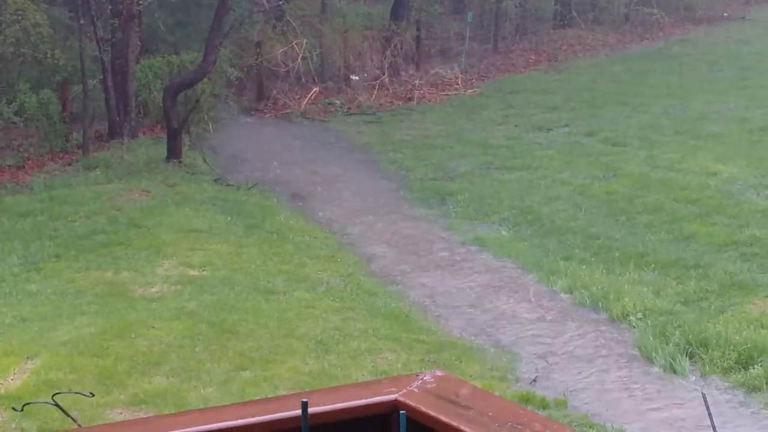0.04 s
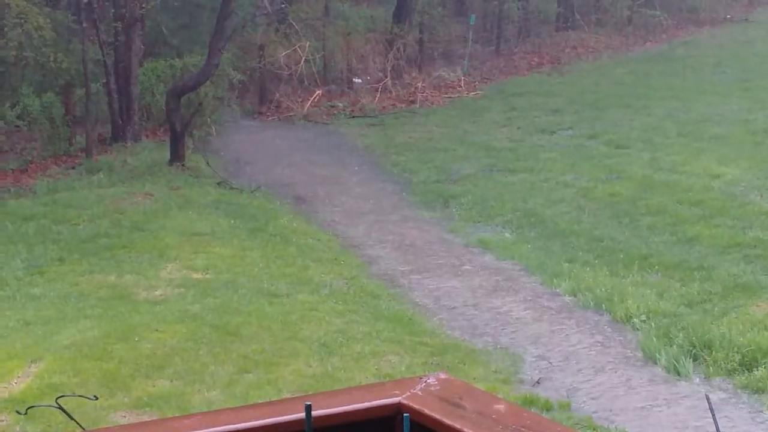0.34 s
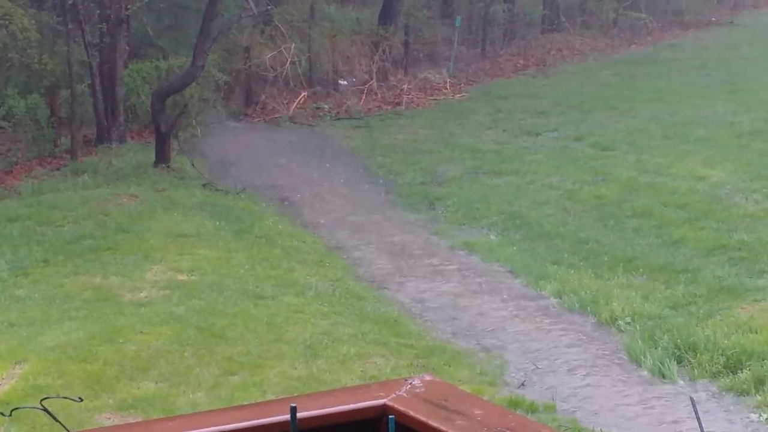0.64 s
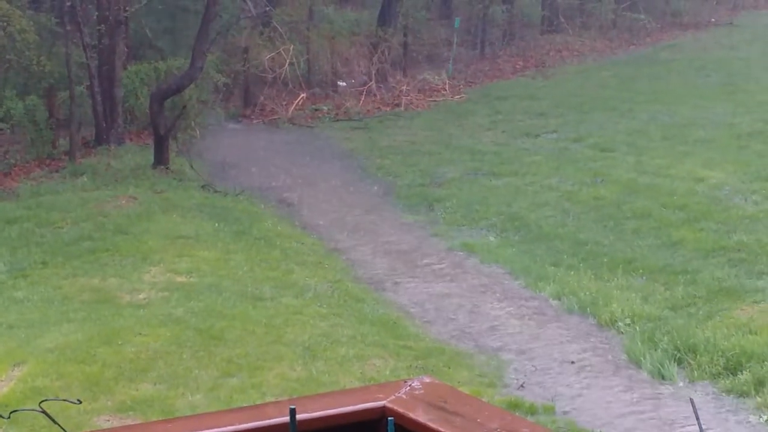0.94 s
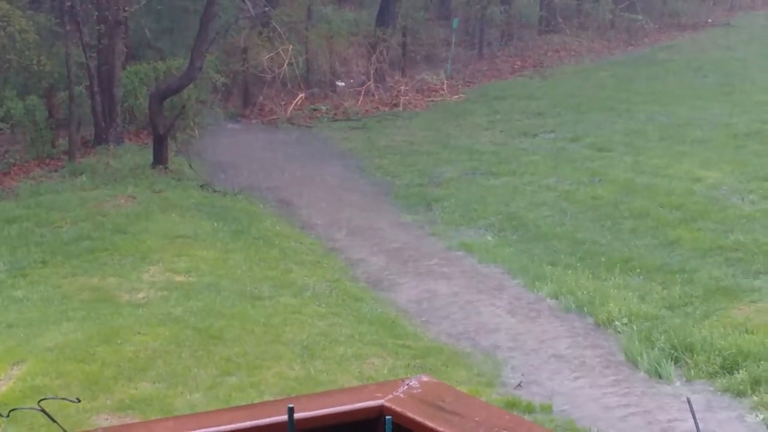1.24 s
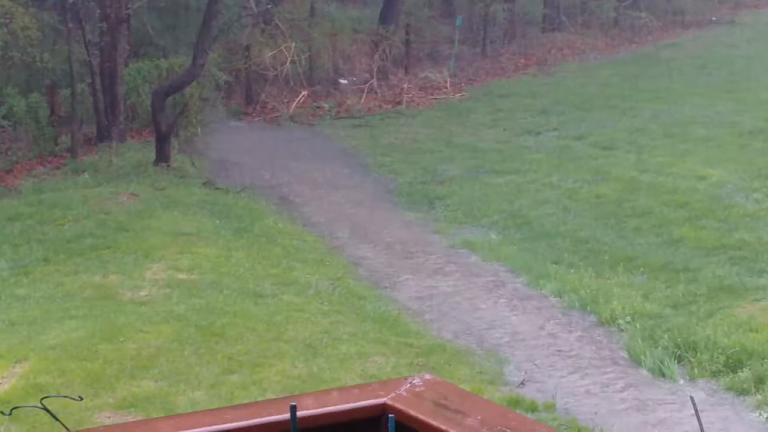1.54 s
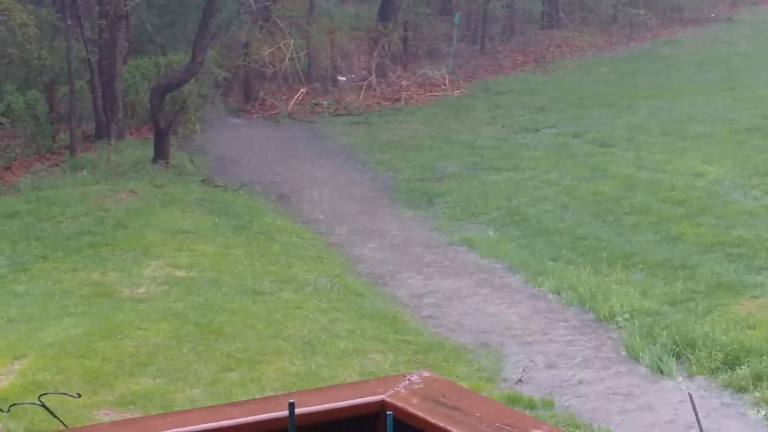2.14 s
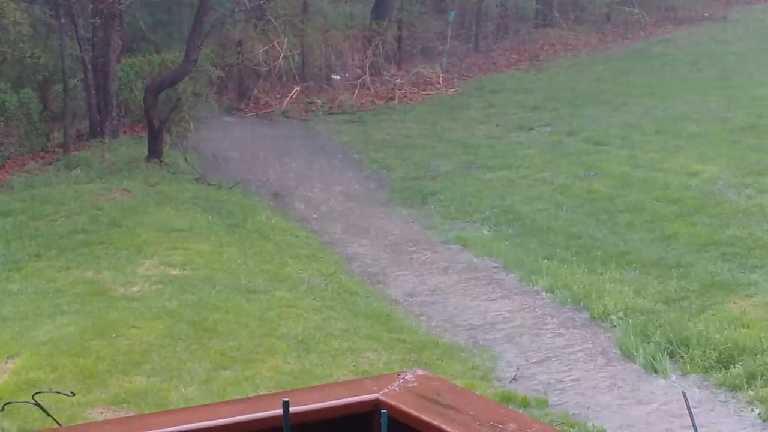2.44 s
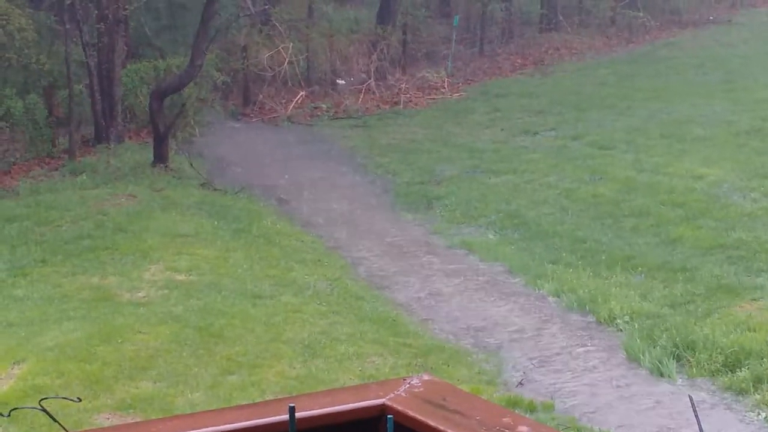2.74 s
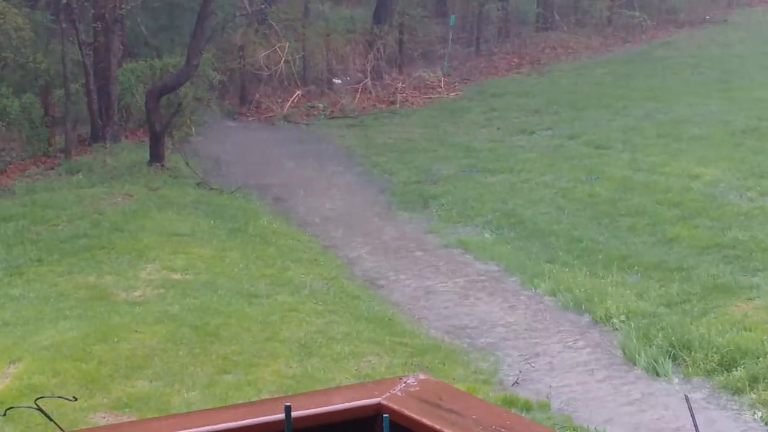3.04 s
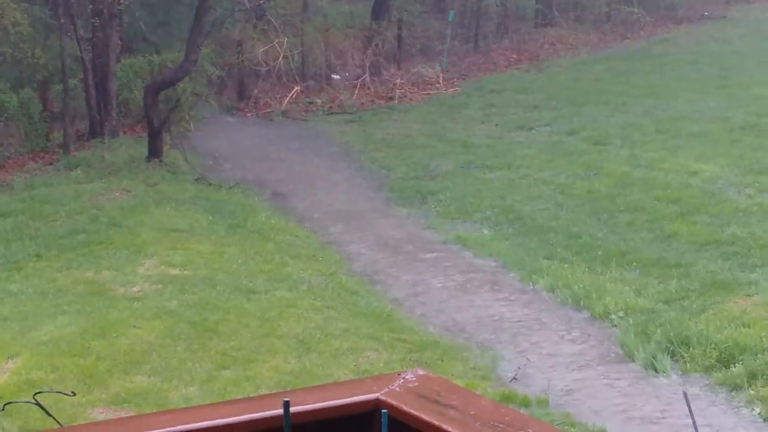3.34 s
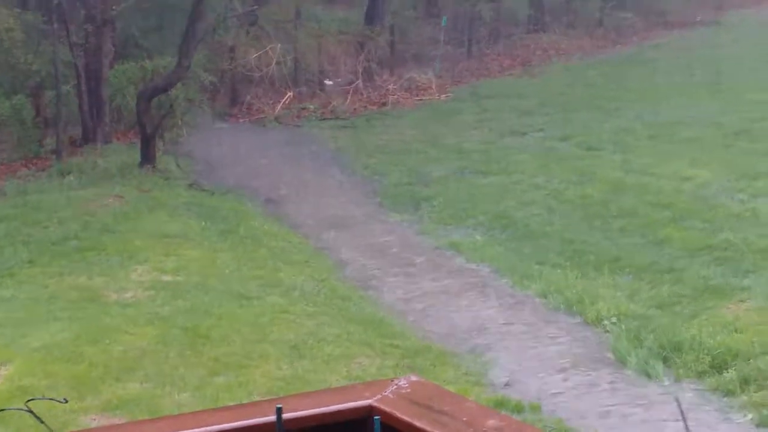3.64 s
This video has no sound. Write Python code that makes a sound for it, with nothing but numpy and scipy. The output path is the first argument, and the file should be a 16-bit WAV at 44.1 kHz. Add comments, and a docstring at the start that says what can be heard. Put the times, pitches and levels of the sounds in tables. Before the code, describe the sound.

Rain falls steadily in a backyard, heard from a wooden deck where single drops land with sharp ticks and tiny splashes, mainly on the right. Behind them are an even hiss and a low rumble like far traffic, softening near the end.

```python
"""Steady rain from a deck

Far drops on a lawn and woods merge into a hiss over a low rumble, perhaps distant traffic.
Near drops tick sharply on the deck, mostly to the right, each with a short spray; the hardest
ring briefly. A few thin, high pings sound. A limiter turns the sound down around the hardest ticks."""
import sys
import numpy as np
from scipy import signal
from scipy.fft import rfft, irfft
from scipy.io import wavfile
from scipy.ndimage import uniform_filter1d

SR = 44100
rng = np.random.default_rng(int(sys.argv[2]) if len(sys.argv) > 2 else 0)


def transcribe(signal):
    """Save signal, clipped to [-1, 1], as a 16-bit WAV file at the path in sys.argv[1]."""
    frames = np.atleast_2d(signal).T
    limited = np.clip(frames, -1, 1)
    pcm = np.round(limited * 32767).astype(np.int16)
    wavfile.write(sys.argv[1], SR, pcm)


N = 176400
TIME, HZ = np.arange(N) / SR, np.fft.rfftfreq(N, 1 / SR)

# The tone of the hiss. Each row: frequency in Hz, left and right strength in dB.
HISS_TONE = [(30, -82, -102), (197, -75.5, -71), (395, -78, -72.5), (540, -74.5, -75), (724, -73.5, -70.5),
             (830, -74.5, -73), (1250, -74, -70.5), (1660, -72.5, -69.5), (1840, -74.5, -66.5),
             (2280, -75, -68), (2670, -74.5, -66), (2880, -80.5, -68), (3290, -74, -71.5), (4280, -78, -75),
             (5000, -75, -73), (6950, -77, -76.5), (8500, -83, -69), (9600, -83.5, -75.5),
             (13400, -85, -78), (15000, -96, -84)]
# How alike the hiss is on both sides. Each row: frequency in Hz, likeness (0-1), left lead in radians.
HISS_STEREO = [(100, 1, 0.87), (400, 0.81, 0.46), (750, 0.57, 0.72), (1056, 0.3, 1.03), (1600, 0.56, 3.6),
               (1940, 0.38, 4.2), (2450, 0.6, 6.8), (2810, 0.6, 7.15), (3280, 0.55, 9.1), (4160, 0.04, 12)]
# The rain swells and eases. Each row: time in seconds, then low, middle and treble change in dB.
RAIN_LEVELS = [(0, 1.5, 0, -0.5), (.75, 0.9, 0.4, -1.8), (1.25, 2.6, 1.5, 1), (1.6, 1.6, 1.5, -0.2),
               (2.08, 2.5, 2, -0.5), (2.2, -2, -.5, -3.5), (2.6, -0.6, -0.5, -2.5), (3.12, -0.5, 0, -3),
               (3.22, -3, -2.5, -5), (3.5, -4, -5, -7), (3.7, -6.5, -7, -8), (4, -6.5, -8, -8.5)]
# The tone of the rumble. Each row: frequency in Hz, strength in dB.
RUMBLE_TONE = [(15, -88), (32, -90), (43, -64.5), (54, -80), (68, -62.5), (90, -63.5), (120, -66),
               (150, -73), (220, -68.5), (320, -78.5), (500, -88.5), (2000, -130)]
# Hums in the rumble. Each row: pitch in Hz, width in Hz.
HUMS = [(195, 35), (270, 58)]
# The low sounds over time. Each row: time in seconds, then rumble, lower hum and upper hum gain in dB.
RUMBLE_LEVELS = [(0, 0.5, -54, -68), (.75, 1, -59, -72), (.87, 0.5, -47, -57), (1.25, 2.5, -60, -56),
                 (1.7, 2, -52, -48), (2.05, 3, -45.5, -44), (2.2, 1.5, -48.5, -51), (2.66, -1.5, -47, -54),
                 (2.74, .5, -48, -41), (2.88, 0, -46, -52), (3.12, 0, -44.5, -48), (3.25, -3, -47.5, -48),
                 (3.45, -6, -44, -57), (3.6, -3.5, -54, -53), (3.85, -4, -48, -50.5), (4, -5.5, -50.5, -63)]
# Loud drops. Each row: start in seconds, then level, body, treble and left-side gain in dB,
# ringing pitch in Hz, spray gain in dB.
LOUD_DROPS = [(.0905,-4.5,-12,-19,-3.5,8750,-25), (.1055,-16,-23,-11,0,8770,-18),
              (0.1127,-10,-23,-17,-15,8400,-24), (.193,-18,-16,-11,-4,8580,-16),
              (0.2127,-10,-25,-24,-7,7900,-23), (.341,-18,-23,-14,-7,9930,-16),
              (0.3482,-12,-19,-14,-8,8580,-22), (0.381,-5,-25,-26,-7,8600,-32),
              (.4319,-17.5,-18,-14,-5,8150,-28), (0.4965,-12.5,-26,-22,-3.5,7760,-21),
              (.576,-15,-17,-16,-7,8950,-28), (0.8897,-13.5,-13,-20,-6,8610,-26),
              (0.916,-13,-16,-16,-7,7700,-22), (0.9904,-13,-22,-21,0.5,7800,-26),
              (1.0014,-17,-19,-14,-11,8390,-14.5), (1.0585,-11.5,-24,-18,-8,8970,-21),
              (1.0872,-19,-18,-17,-5,8800,-24), (1.2588,-16.5,-18,-20,-7.5,11500,-26),
              (1.286,-21,-21,-13,-6.5,8110,-28), (1.2995,-11,-23,-17,-9,8850,-19),
              (1.3085,-14,-18,-24,-3,6030,-19), (1.5153,-14,-25,-13,-9,9150,-30),
              (1.5378,-11,-25,-25,-12,8900,-30), (1.5738,-14,-18,-17,-9,9200,-26),
              (1.67,-2.5,-10,-13,-9,8700,-25), (1.7268,-12.5,-24,-23,-10,9300,-33),
              (1.902,-10.5,-28,-18,-8,9000,-21), (2.0239,-17.5,-12,-14,-5,8420,-18),
              (2.0582,-15.5,-8,-10,-6,9680,-14.5), (2.1535,11,-10.5,-24,-7,8500,-36.5),
              (2.2106,-14.5,-24,-17,-7.5,9240,-18.5), (2.256,-5,-25,-21,0.5,6400,-26),
              (2.5015,-11,-27,-17,-1.5,9100,-32), (2.7336,-13.5,-22,-18,-8,8550,-20),
              (2.758,-12,-33,-16,-11,9000,-24), (2.853,-3.5,-4,-17,-4.5,9300,-25.5),
              (2.869,-10.5,-15,-13,-4.5,8200,-25), (3.1606,-17.5,-14,-13,-8.5,9810,-14.5),
              (3.181,-2.5,-20,-26,-7,9500,-33), (3.3928,-3.5,-16,-22,-11,8950,-26),
              (3.5086,-15,-32,-18,-6,9600,-20.5), (3.5613,-10,-23,-25,-5.5,7300,-28),
              (3.66,-24,-24,-13,-7.5,8620,-19), (3.9322,-18,-16,-22,-5,8500,-23),
              (3.9383,-11,-23,-18,-7,8800,-37)]
# The tone of a plain tick. Each row: frequency in Hz, left and right strength in dB.
TICK_TONE = [(300, -34, -33), (1500, -19, -17.5), (2960, -10, -7), (4530, -9.5, -13.5), (5630, 1, -10),
             (7500, 0.5, -1), (9030, -9, 0.5), (11500, -8.5, -2.5), (15200, -5, -7.5)]
# Notes of the spots hit hardest. Each row: start in seconds, pitch in Hz, level in dB,
# seconds to fade by 60 dB.
DECK_NOTES = [(.0905,8000,-7,0.013), (.0905,4200,-7,0.0071), (.0905,5470,-13,.006), (0.2136,7900,-11,.006),
              (0.212,5800,-13.5,0.0052), (0.3811,9100,-6,0.0098), (0.381,4400,-14,0.0055),
              (.4967,8150,-15,0.013), (1.67,5200,-19,.006), (2.2559,7700,-11,0.011),
              (2.2563,11000,-3,0.0068), (2.256,5350,-8,0.0055), (2.853,2710,-18,0.0066),
              (2.854,4240,-18,0.0072), (2.853,6900,-5,0.0054), (3.3928,9100,-7,.006),
              (3.3946,3000,-18.5,0.0088)]
# High pings. Each row: start in seconds, pitch in Hz, level in dB, seconds to fade by 60 dB.
PING_NOTES = [(.745, 11500, -34, .17), (2.716, 7520, -26.5, 0.21), (2.743, 11500, -30, 0.14),
              (2.777, 11500, -30, 0.15)]

PLAIN_BODY_DB, PLAIN_TREBLE_DB = -20, -24  # these leave a tick's tone unchanged
ARRIVAL_S = .001 + np.array([[.000223], [0]])  # a drop reaches the left ear slightly later


def amp(db):
    """Turns decibels into a gain."""
    return 10 ** (np.asarray(db) / 20)


def left_gain(db):
    """Stereo gains that change only the left side."""
    return amp([[db], [0]])


def unit(x, axis=None):
    """Scales a signal to an average power of 1."""
    return x / np.sqrt(np.mean(x ** 2, axis, keepdims=True) + 1e-20)


def spectrum(table, hz):
    """Joins a table's rows into curves over pitch."""
    row_hz, *columns = np.transpose(table)
    return np.array([np.interp(np.log(hz + 1), np.log(row_hz), c) for c in columns])


def curves(table):
    """Joins a table's rows into curves over time."""
    row_s, *columns = np.transpose(table)
    return np.array([np.interp(TIME, row_s, c) for c in columns])


def add(mix, start_s, sound):
    """Mixes in a stereo sound at its start time."""
    part = mix[:, max(round(start_s * SR), 0):]
    part[:, :sound.shape[1]] += sound[:, :part.shape[1]]


def decay(t, fade_s):
    """Starts suddenly at t = 0, then dies away."""
    return (t >= 0) * np.exp(-np.maximum(t, 0) / fade_s)


def bump(hz, centre_hz, width_hz):
    """A resonance: a hill of height 1 around one pitch."""
    return 1 / (1 + ((hz - centre_hz) / width_hz) ** 2)


def noise(tone):
    """Noise with a given gain at each frequency."""
    return irfft(rfft(rng.standard_normal(N)) * tone, N)


def waver(depth_db, cutoff_hz):
    """A gain that wanders a little at random."""
    return amp(depth_db * unit(noise((HZ > 2) / (1 + (HZ / cutoff_hz) ** 2))))


def far_rain(patter_per_s=1200, patch_db=1.02, flicker_db=.46):
    """Countless far drops blur into a patchy hiss, with a dense patter of nearer ones."""
    grid = signal.stft(rng.standard_normal((2, N)), nperseg=512)[2]  # noise by side, pitch and time
    patches = uniform_filter1d(rng.standard_normal(grid.shape[1:]), size=9, axis=0)
    patches = unit(uniform_filter1d(patches, size=10, axis=1))
    flicker = unit(uniform_filter1d(rng.standard_normal(grid.shape[2]), size=3))
    grid *= amp(patch_db * patches + flicker_db * flicker)
    hiss = unit(signal.istft(grid, nperseg=512)[1][:, :N])
    sizes = amp(2 * np.minimum(rng.exponential(1, (2, N)), 5)) * rng.choice([-1, 1], (2, N))
    patter = unit(sizes * (rng.random((2, N)) < patter_per_s / SR))
    right, unrelated = rfft(unit(hiss + amp(-7.5) * patter))
    likeness, lead = spectrum(HISS_STEREO, HZ)
    likeness = np.clip(likeness, 0, 1)
    left = likeness * np.exp(1j * lead) * right + np.sqrt(1 - likeness ** 2) * unrelated
    tone = amp(spectrum(HISS_TONE, HZ) + 1.3 * bump(HZ, centre_hz=2540, width_hz=78))
    both = np.array([left, right]) * tone * np.sqrt(SR / 2)
    low = 1 / (1 + (HZ / 1600) ** 6)
    treble = 1 - 1 / (1 + (HZ / 3500) ** 4)
    bands = low, 1 - low - treble, treble
    return sum(irfft(both * band, N) * amp(db) for band, db in zip(bands, curves(RAIN_LEVELS)))


def rumble():
    """A low, heaving rumble, perhaps traffic, with two fuzzy hums that swell and fade."""
    level_db, *hum_dbs = curves(RUMBLE_LEVELS)
    out = amp(level_db) * noise(amp(spectrum(RUMBLE_TONE, HZ)[0])) * np.sqrt(SR / 2)
    for (hz, width), db in zip(HUMS, hum_dbs):
        band = 1 / np.sqrt(1 + ((HZ - hz) / width * 2) ** 4)
        out += amp(db) * unit(noise(band))
    return out * left_gain(-2.5) * waver(depth_db=1, cutoff_hz=20)


def drop(level_db, body_db, treble_db, left_db, ring_hz, spray_db, size=4096):
    """One drop hits: a sharp tick, its echo off the deck, and a short spray."""
    t = np.arange(size) / SR - ARRIVAL_S
    hz = np.fft.rfftfreq(size, 1 / SR)
    tick_noise, echo_noise, spray_noise = rng.standard_normal((3, 2, size))
    body, treble = spectrum([(4800, 1, 0), (7500, 0, 0), (9500, 0, 0), (12000, 0, 1)], hz)
    plain_db = spectrum(TICK_TONE, hz)
    own_db = body * (body_db - PLAIN_BODY_DB) + treble * (treble_db - PLAIN_TREBLE_DB)
    tick_tone = unit(amp(plain_db + own_db + 12.5 * bump(hz, ring_hz, width_hz=1220)), axis=1)
    deck_db = 1.5 * bump(hz, centre_hz=8650, width_hz=520)  # the deck colours the spray
    spray_tone = unit(amp(plain_db + own_db / 2 - 4.5 * treble + deck_db), axis=1)
    strike = decay(t, fade_s=.00035)
    tick = irfft(rfft(tick_noise * strike) * tick_tone)
    tick *= np.linalg.norm(strike[1]) / np.linalg.norm(tick, axis=1, keepdims=True)  # set its energy
    echo = amp(-12.5) * irfft(rfft(echo_noise * decay(t - .0021, fade_s=.0007)) * tick_tone)
    spray = amp(spray_db) * irfft(rfft(spray_noise * decay(t, fade_s=.02)) * spray_tone)
    return amp(level_db + 4.5) * left_gain(left_db) * (tick + echo + spray)


def near_drops(small_per_s=64):
    """Loud drops hit the deck, and small ones fall at random among them."""
    out = np.zeros((2, N))
    for start_s, *row in LOUD_DROPS:
        add(out, start_s, drop(*row))
    rain_treble_db = curves(RAIN_LEVELS)[2]
    for at in np.flatnonzero(rng.random(N) < small_per_s / SR):
        db = -32.5 + rain_treble_db[at] + 4 * min(rng.exponential(), 3)
        body, treble, left = rng.normal(0, 3, 3)
        small = drop(db, PLAIN_BODY_DB + body, PLAIN_TREBLE_DB + treble, left - 6,
                     ring_hz=rng.uniform(6400, 11500), spray_db=-28)
        add(out, at / SR, small)
    return out


def deck_rings():
    """A hard drop makes the spot it hits ring for a moment."""
    out = np.zeros((2, N))
    t = TIME[:SR // 20] - ARRIVAL_S
    for start_s, hz, db, ring_s in DECK_NOTES:
        ring = amp(db) * decay(t, ring_s / np.log(1000)) * np.sin(2 * np.pi * hz * t)
        add(out, start_s, ring * left_gain(-16))
    return out


def pings(rise_s=.003):
    """Thin, high notes, perhaps drops on a piece of metal."""
    out = np.zeros((2, N))
    t = TIME[:SR // 4]
    for start_s, hz, db, ring_s in PING_NOTES:
        loudness = amp(db) * np.minimum(t / rise_s, 1) * decay(t, ring_s / np.log(1000))
        add(out, start_s, loudness * np.sin(2 * np.pi * hz * t) * left_gain(-15))
    return out


def scene():
    """Far rain and rumble waver behind the near drops, rings and pings."""
    background = (far_rain() + rumble()) * waver(depth_db=.6, cutoff_hz=12)
    return background + near_drops() + deck_rings() + pings()


def record(dry, limit_db=-4.5, look_ahead_s=.016, recover_s=.0023):
    """A limiter dips the level around the hardest ticks; then the highest treble is cut."""
    power = abs(uniform_filter1d((dry ** 2).max(0), size=16))
    peak_db = 10 * np.log10(2 * power + 1e-12)
    log_excess = np.log(np.maximum(peak_db - limit_db, 0) + 1e-9)
    # Each dip eases in before its peak and lets go quickly after it.
    before = np.maximum.accumulate((log_excess - TIME / look_ahead_s)[::-1])[::-1] + TIME / look_ahead_s
    after = np.maximum.accumulate(log_excess + TIME / recover_s) - TIME / recover_s
    dip_db = np.exp(np.maximum(before, after))
    limited = np.clip(dry / amp(dip_db), -1, 1)
    treble_cut = signal.firwin(301, cutoff=14900, window=("kaiser", 8), fs=SR)
    return signal.oaconvolve(limited, treble_cut[None], "same")


dry = scene()
out = record(dry)
transcribe(out)
```